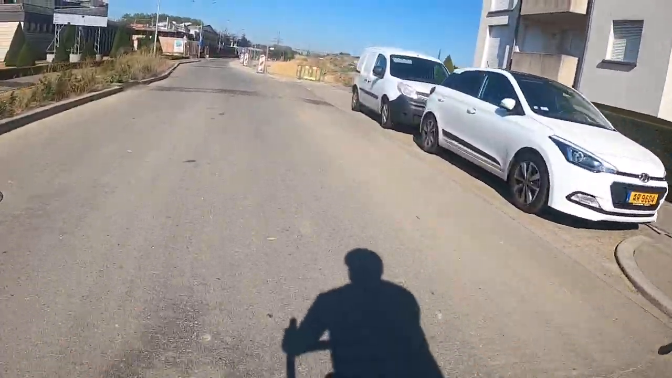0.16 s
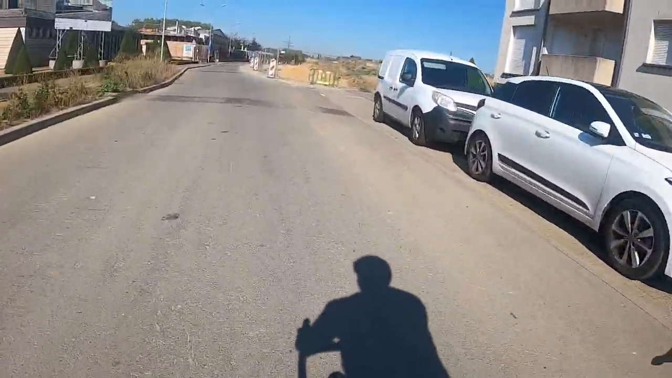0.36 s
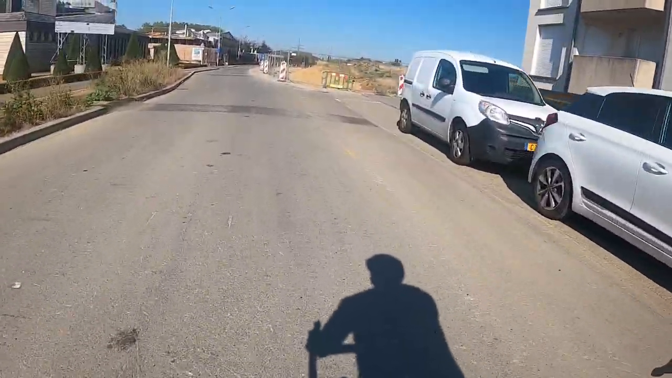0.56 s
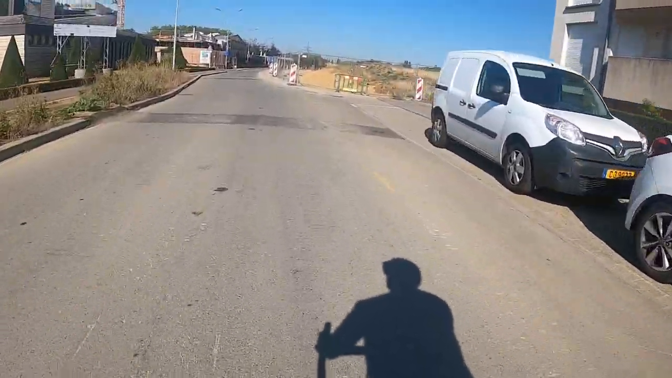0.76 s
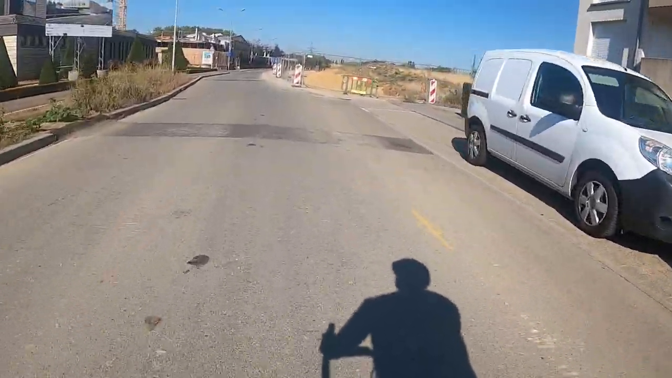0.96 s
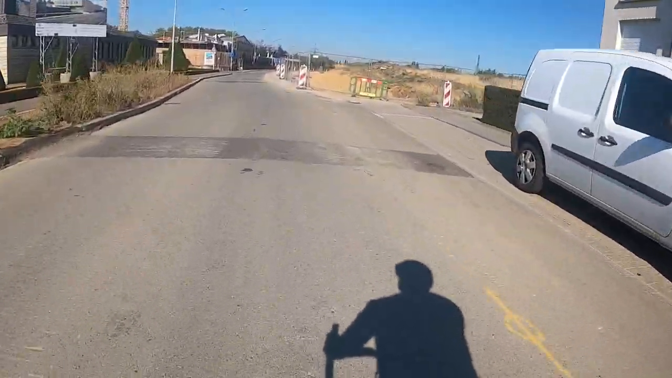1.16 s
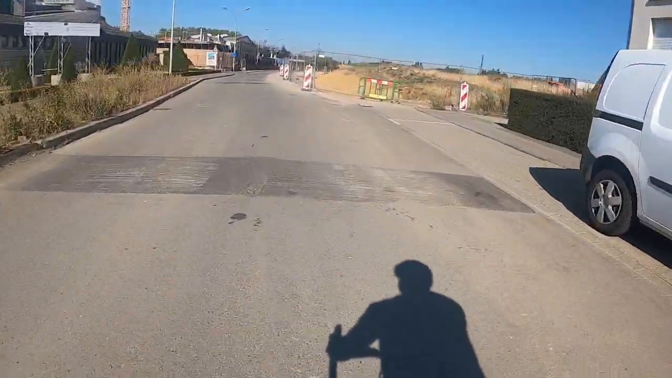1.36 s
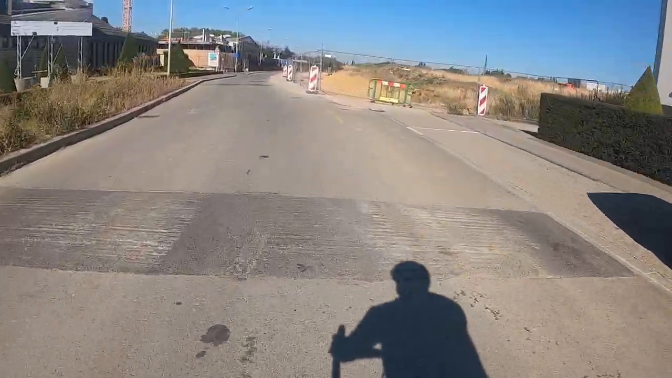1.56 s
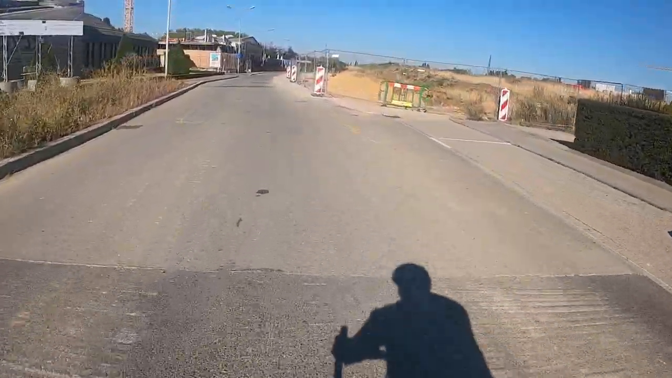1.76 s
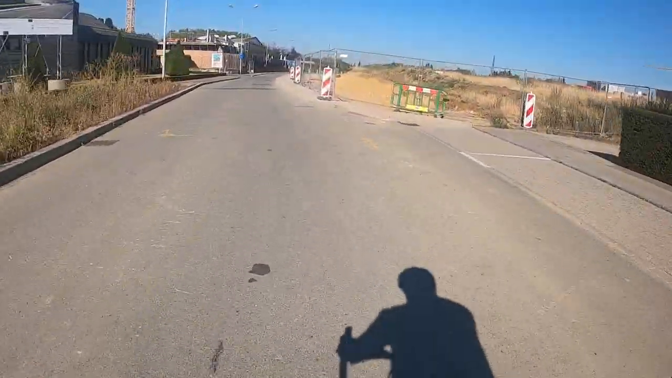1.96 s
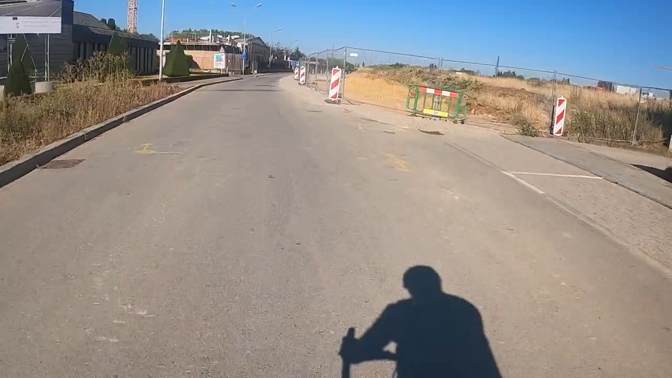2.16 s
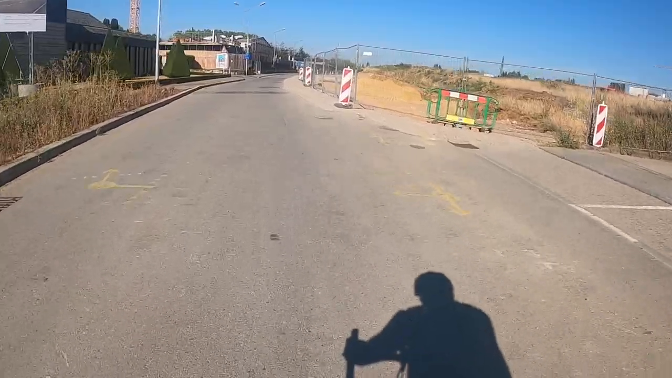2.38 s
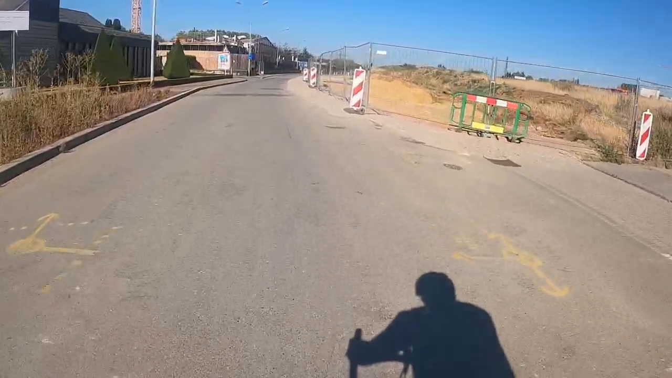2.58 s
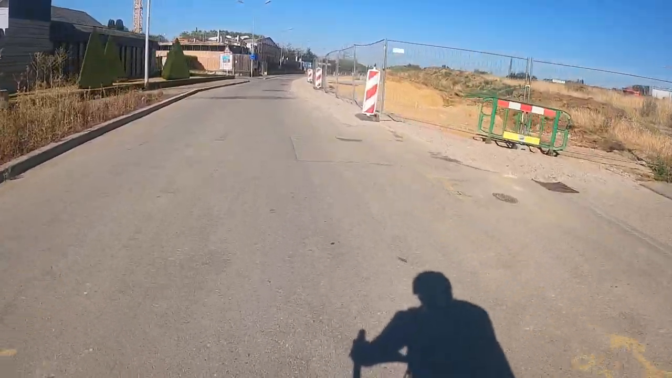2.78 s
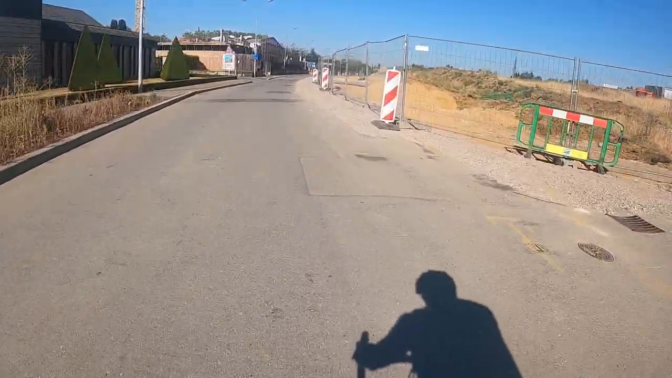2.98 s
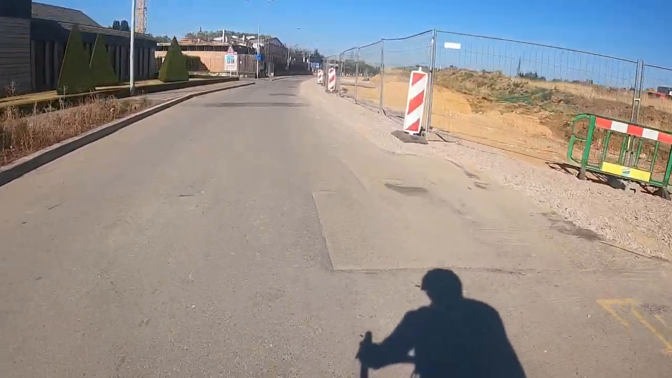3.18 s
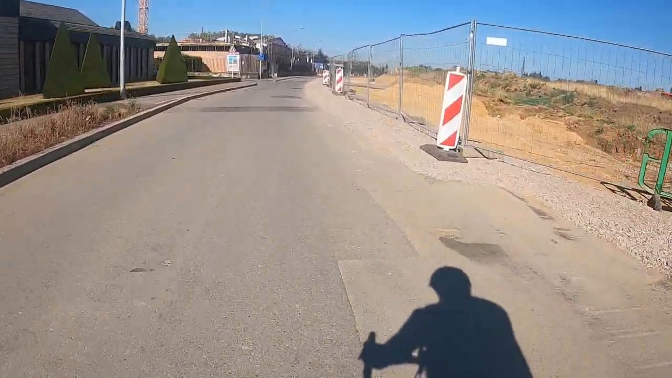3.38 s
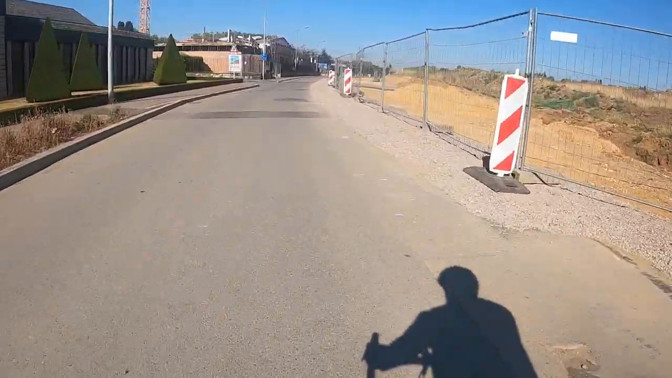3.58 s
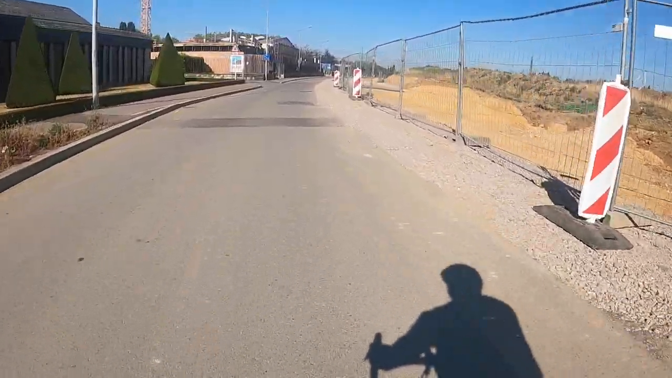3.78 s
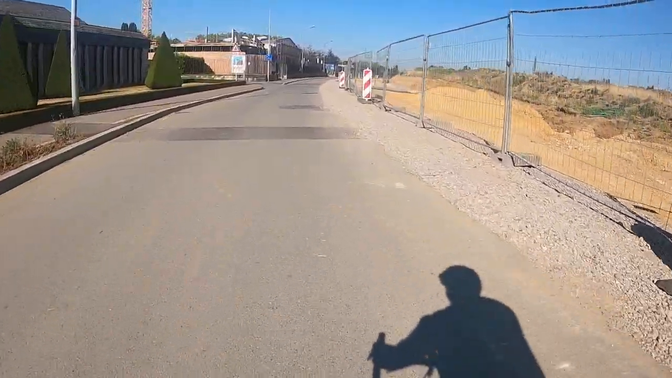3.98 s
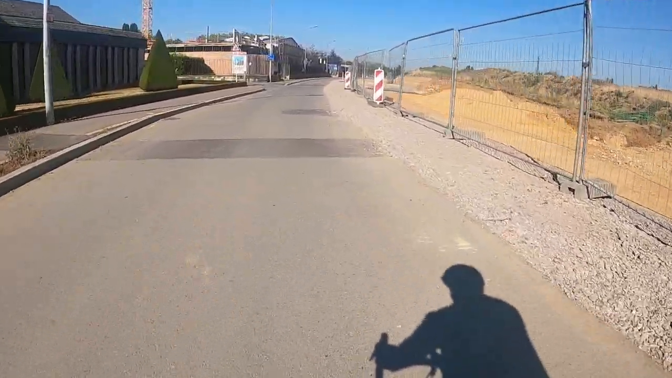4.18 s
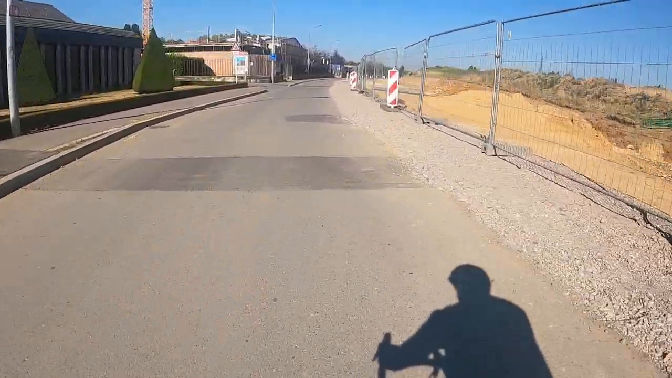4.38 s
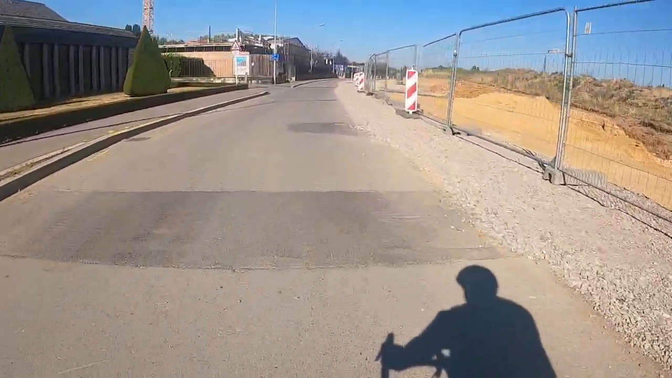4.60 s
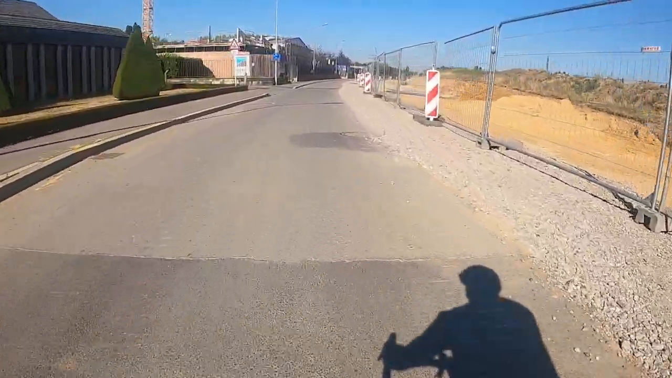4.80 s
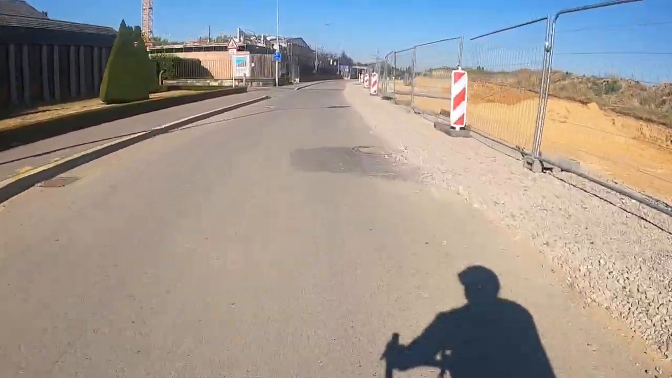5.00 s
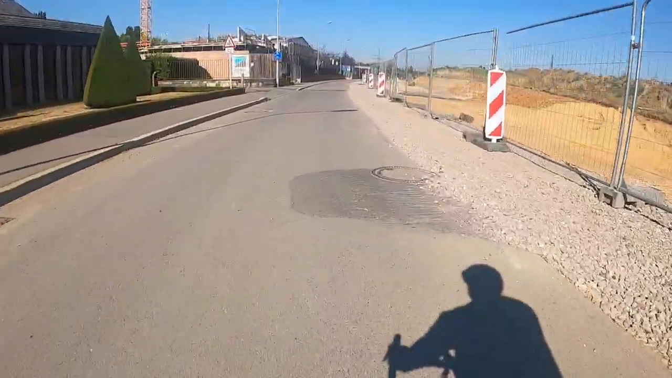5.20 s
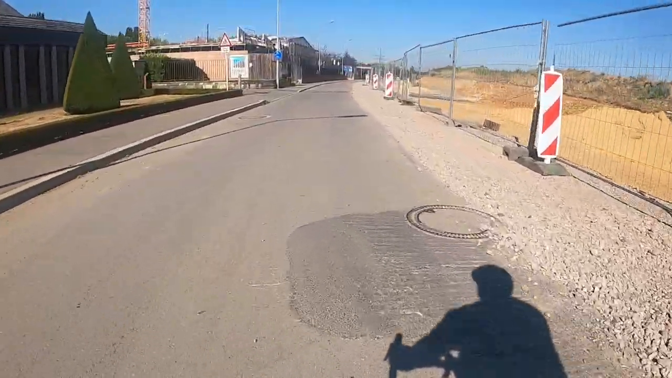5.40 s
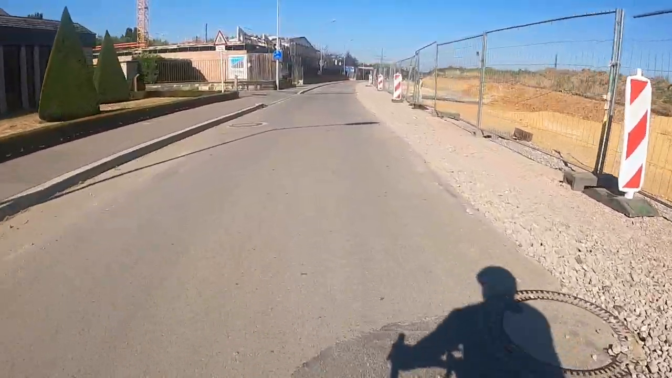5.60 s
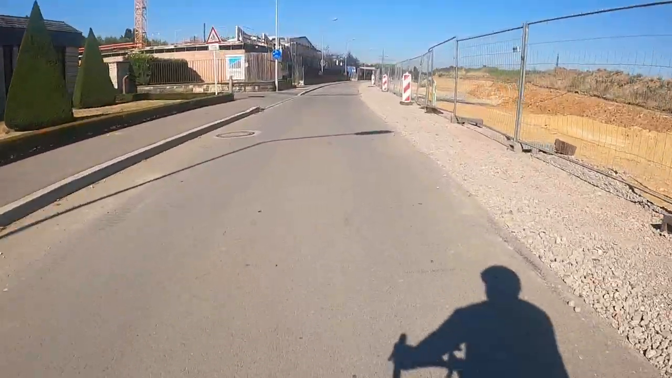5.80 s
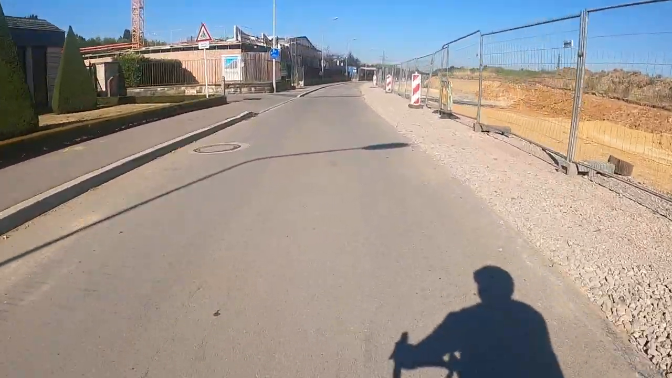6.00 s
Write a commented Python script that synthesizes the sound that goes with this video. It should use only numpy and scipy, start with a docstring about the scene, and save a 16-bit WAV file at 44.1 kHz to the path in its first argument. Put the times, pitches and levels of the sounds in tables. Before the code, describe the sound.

Close on a moving bike: deep wobbling rumble, wind thumps and grainy tyre noise, broken by short clattering bumps at the start, middle and end.

```python
"""Asphalt street, on a rolling bicycle; one microphone fixed to it, so close on every part of it.
From the start the frame bounces on its tyres (a wandering sine), wind buffets the microphone (coloured noise)
and road grain rings through tyre and frame (resonances); a hum and a roar off parked cars fade by about 1.8 s.
Wheels cross patch edges and loose parts rattle (ringing modes) from 0.2 s and again around 2 s.
A faint trembling tone joins at 3.2 s, the road grows louder near 4 s, and the densest rattle comes at 5 s."""
import sys
import numpy as np
from scipy import signal
from scipy.fft import rfft, irfft
from scipy.io import wavfile
from scipy.ndimage import uniform_filter1d

SR = 44100
rng = np.random.default_rng(int(sys.argv[2]) if len(sys.argv) > 2 else 0)


def master(y):
    """Save y as 16-bit WAV."""
    cut = np.clip(np.atleast_2d(y).T, -1, 1)
    pcm = np.round(cut * 32767)  # scale
    wavfile.write(sys.argv[1], SR, pcm.astype(np.int16))


def magnitude_from_level(level_db):
    """Linear magnitude for a level in decibels (20 dB per decade)."""
    exponent = np.asarray(level_db, float) / 20
    return 10 ** exponent


N = 266805

# frame bouncing on the tyres: (time [s], level [dB])
BOUNCE_LEVEL = [(0.0, -28), (0.22, -26), (0.29, -15), (0.4, -23.5), (0.54, -19.5), (0.59, -31.5),
                (1.13, -17.5), (1.2, -22.5), (2.0, -25), (2.04, -15.5), (2.93, -30.5), (2.98, -26),
                (3.1, -21), (3.25, -27.5), (3.33, -20), (3.72, -24), (3.76, -35), (3.94, -19),
                (3.99, -32.5), (4.45, -21.5), (4.52, -32), (4.73, -23), (4.92, -38.5), (5.04, -20.5),
                (5.37, -15.5), (5.71, -28), (5.8, -19.5), (5.9, -23), (5.95, -16), (6.05, -23)]
# hum beside the parked cars: (time [s], fundamental level [dB], octave level [dB])
HUM_LEVEL = [(0.0, -18.5, -31.5), (0.1, -24, -31.5), (0.2, -30, -36), (0.3, -28, -35.5), (0.42, -18, -50),
             (0.47, -41, -47), (0.56, -27, -41), (0.68, -21, -34), (0.8, -24, -36), (0.9, -26, -38),
             (0.97, -28, -41), (1.05, -33, -43), (1.2, -25, -43), (1.55, -25.5, -43), (1.76, -39, -34.5)]
# upper harmonics of the hum: (multiple of the fundamental, level over the fundamental [dB])
HUM_HARMONICS = [(3, -21.5), (4, -30.5)]
# wind on the microphone: (time [s], buffet level [dB], lift of the faster flutter [dB], air hiss level [dB])
WIND_LEVEL = [(0.0, -25, -3, -61.5), (0.23, -19.5, -1, -66), (0.29, -25, 10, -62), (0.35, -32.5, 4, -66.5),
              (0.46, -20.5, 1, -70), (0.62, -27, 3.5, -71.5), (0.76, -29, 0.5, -69), (0.93, -21, 0, -69),
              (1.14, -32, -5.5, -67.5), (1.5, -35, 13, -67), (1.53, -32.5, -3, -65.5), (1.72, -20, -1, -65),
              (1.85, -25, -3.5, -64), (1.97, -19.5, 3.5, -67.5), (2.12, -32.5, 3, -65.5),
              (2.18, -25.5, 4, -69), (2.44, -25.5, -8, -69.5), (2.59, -28, -2, -71), (2.73, -20, -1, -67.5),
              (2.78, -22, -3.5, -70.5), (2.85, -18, -3, -71.5), (2.92, -19.5, -2.5, -70),
              (3.0, -22.5, -1.5, -68.5), (3.17, -27.5, -7, -69.5), (3.31, -24, 4, -70.5),
              (3.37, -28, -3, -67.5), (3.59, -26.5, -5, -66.5), (3.62, -21, -11.5, -66.5),
              (3.89, -39, 14, -68), (4.06, -22, -3, -68), (4.15, -25.5, -3, -70.5),
              (4.25, -21, -10.5, -67.5), (4.5, -29, 0.5, -66), (4.94, -38, 20, -66), (5.04, -27, 4, -68),
              (5.15, -40, 8, -66), (5.17, -26.5, 6, -68), (5.36, -29.5, -2, -71.5), (5.61, -29, -4.5, -74),
              (5.78, -23, -2, -72), (5.85, -33.5, 5, -70), (6.05, -29, -3, -74)]
# relative spectrum of the buffeting: (frequency [Hz], density [dB per Hz])
BUFFET_SPECTRUM = [(16, 0), (24, -0.5), (32, 3.5), (45, 1.5), (70, 4.5), (110, -3), (160, -8), (230, -17),
                   (400, -37.5)]
# relative spectrum of the air hiss: (frequency [Hz], density [dB per Hz])
HISS_SPECTRUM = [(1000, -22), (1700, 3), (2420, -6), (3010, -7), (3790, -13), (4250, -13.5), (4620, -16.5),
                 (5110, -19), (10600, -35.5), (13700, -63), (22000, -120)]
# road under the wheels, between the bumps:
# (time [s], tyre thrum [dB], frame roar [dB], spoke whirr [dB], grit sizzle [dB])
ROAD_LEVEL = [(0.0, -37, -41.5, -36, -51.5), (0.35, -35, -43.5, -42, -56), (0.7, -40, -46, -40.5, -57),
              (1.1, -39.5, -41, -42.5, -51.5), (1.55, -39.5, -41, -41, -52.5), (1.9, -37, -42, -41, -53.5),
              (2.4, -40, -43.5, -43.5, -52), (2.9, -40, -43, -42, -51), (3.3, -38.5, -43, -41.5, -52),
              (3.9, -37, -36, -37.5, -46.5), (4.4, -35, -37, -38, -48.5), (5.0, -33, -37, -36, -45.5),
              (5.15, -42.5, -40.5, -43, -56), (5.4, -39, -44.5, -41.5, -52.5),
              (6.05, -40, -43.5, -42.5, -51.5)]
# resonances of the tyre: (frequency [Hz], width [Hz], relative level [dB])
TYRE_RESONANCES = [(250, 75.6, -5.5), (295, 38, -1.5), (340.4, 32.3, -1.5), (399.6, 57, -4.5),
                   (447, 50.4, -6.5)]
# resonances of the frame: (frequency [Hz], width [Hz], relative level [dB])
FRAME_RESONANCES = [(537, 200, -11.5), (667, 86, -3.5), (767, 71, -2), (895, 67, -5.5)]
# resonances of the spokes: (frequency [Hz], width [Hz], relative level [dB])
SPOKE_RESONANCES = [(985, 99, -4), (1159, 71, 0.5), (1318, 47, 1), (1470, 67, -1.5), (1646, 65, -8.5)]
# resonances of small parts on the frame: (frequency [Hz], width [Hz], relative level [dB])
SMALL_PART_RESONANCES = [(1927, 170, 1), (2260, 420, -4.5), (2597, 130, 1), (3026, 240, -3.5),
                         (3384, 180, -1.5), (3930, 270, -7.5), (4214, 130, -2), (4560, 290, -13)]
# coarse spots that shake the wheels harder: (time of peak [s], half of the rise time [s], lift [dB])
COARSE_SPOTS = [(0.15, 0.042, 1.5), (0.27, 0.038, 5.5), (0.44, 0.034, 2.5), (0.6, 0.016, 4),
                (1.46, 0.044, 5), (1.992, 0.041, 9.5), (2.09, 0.045, 5), (2.2, 0.054, 7), (2.34, 0.016, 4),
                (2.71, 0.018, 4), (3.24, 0.13, 4.5), (3.52, 0.025, 4.5), (3.89, 0.031, 0.5),
                (4.63, 0.0099, 1.5), (5.045, 0.017, 12), (5.12, 0.033, 6), (5.19, 0.028, 10.5),
                (5.27, 0.027, 3.5), (5.61, 0.014, 0), (5.69, 0.016, 2.5), (5.77, 0.037, 7)]
# share of that lift taken by each: (thrum [dB per dB], roar [dB per dB], whirr [dB per dB], sizzle [dB per dB])
LIFT_SHARES = (0.88, 0.45, 0.67, 0.6)
# tyre roar thrown back by the parked cars: (time [s], level [dB])
THROWN_BACK_LEVEL = [(0.0, -34), (0.2, -38.5), (0.35, -46), (0.55, -48), (0.85, -43), (1.2, -46),
                     (1.6, -69), (6.05, -89)]
# resonances of the car sides: (frequency [Hz], width [Hz], relative level [dB])
CAR_SIDE_RESONANCES = [(566, 190, -10.5), (1034, 103, -1)]
# knocks of loose parts: (time [s], blow level [dB], lift of the low modes [dB], lift of the high modes [dB])
KNOCKS = [(0.219, -33, -1, -4), (0.236, -30, -7, -17), (0.245, -28, 3, -15), (0.252, -39, 0, -11),
          (0.2583, -19.5, -12, -10.5), (0.268, -45, -5, -9), (0.274, -34, -6, -10), (0.286, -36, -6, -7),
          (0.311, -33, -6, -14), (0.319, -34, -5, -22), (0.338, -40, -6, -14), (0.3865, -47, -5, -6),
          (0.4287, -29.5, -8, -20), (0.441, -43, -9, -8), (1.052, -35, -12, -19), (1.966, -32, -12, -26),
          (1.972, -33, -8, -28), (1.98, -44, 13, -23), (2.064, -32, -7, -18), (2.075, -29, -19, -32),
          (2.087, -39, -8, -10), (2.113, -45, -6, -14), (2.221, -45, -8, -9), (2.347, -36, -16, -21),
          (2.36, -38, -13, -13), (2.389, -30.5, -22, -18), (3.805, -30.5, -10, -35), (5.0156, -29, -10, -9),
          (5.024, -31, 3, -15), (5.0307, -17, -6, -20), (5.036, -24, -1, -12), (5.04, -28, -6, -9),
          (5.0448, -17.5, -3, -12), (5.0495, -22, 9, -11), (5.054, -28, 10.5, -15), (5.0555, -29, -7, -14),
          (5.06, -30, -1, -14), (5.064, -27, 7, -18), (5.068, -35, 2, -17), (5.0745, -26, -17, -14),
          (5.0793, -21, -22, -22), (5.0845, -35, -14, -20), (5.0965, -32, -16, -24),
          (5.1025, -32, -11, -11), (5.128, -32, 2, -16), (5.1725, -34, -10, -13), (5.179, -27.5, 2, -13),
          (5.1897, -25, -13, -23), (5.201, -39.5, -14, 0), (5.212, -40, -6, -14), (5.224, -43, 12, -28),
          (5.2405, -27.5, -17, -12.5), (5.244, -33, -16, -25), (5.264, -33, -18, -14),
          (5.269, -35, -14, -13), (5.2907, -34.5, 2, -16), (5.3847, -28, -19, -29), (5.3974, -41, -21, -12),
          (5.743, -28, -8, -26), (5.752, -24.5, -8, -21), (5.765, -25.5, -3, -13), (5.778, -34, 3, -12),
          (5.789, -32.5, -15, -7), (5.8424, -31.5, -4, -33), (5.9173, -41, -11, -13),
          (5.9384, -38, -19, -27), (6.03, -40, -13, -5)]
# modes of the loose parts: (frequency [Hz], relative level [dB], decay by 60 dB [s])
PART_MODES = [(570, -9.5, 0.022), (930, -14.5, 0.025), (1270, -9.5, 0.03), (1745, -8.5, 0.014),
              (1937, -11.5, 0.017), (2290, -12, 0.017), (2664, -15.5, .02), (3140, -18, 0.0071),
              (3290, -10, 0.009), (3600, -10, 0.0094), (3940, -10, 0.0087), (4230, -11.5, 0.0079),
              (4970, -18, 0.007), (5140, 2.5, 0.0029), (6200, -5, 0.0063), (6960, -6.5, 0.005),
              (7600, -4, 0.005), (8900, -13.5, 0.0082), (9800, -9, 0.0018), (12600, -21.5, 0.003),
              (14300, -25, 0.002)]
# wheel striking an edge: (time [s], blow level [dB], lift of the modes above 250 Hz [dB])
EDGE_BLOWS = [(0.2464, -5, -3), (0.261, -6.5, 5), (0.271, -8.5, -14), (0.449, -4.5, -12), (0.46, -8, -3),
              (1.951, -14, -7), (1.97, -15, 11), (2.022, -10.5, -7), (2.047, -12, 7), (2.071, -21, -1),
              (2.108, -20, -5), (2.151, -9, -6), (2.175, -22, 6), (2.195, -20, 8), (2.215, -24, 5),
              (2.336, -22, 1), (3.201, -21, 5), (3.88, -20, 10), (4.635, -16, 7), (5.031, -7.5, -8),
              (5.04, -9, -4), (5.057, -1, -10), (5.074, -9.5, 4), (5.085, -10.5, 9.5), (5.128, -11, 2),
              (5.169, -14, 8), (5.208, -8.5, 3.5), (5.26, -7.5, -3), (5.285, -20, 8), (5.607, -21, 14.5),
              (5.689, -23.5, 14), (5.744, -12, 5.5), (5.764, -8, -1), (5.788, -18, -3)]
# modes of the rim: (frequency [Hz], relative level [dB], decay by 60 dB [s])
RIM_MODES = [(134.7, -16, 0.09), (206, -14, 0.055), (266.5, -23, 0.087), (295.7, -21.5, 0.14),
             (351, -25, 0.07), (453, -24.5, 0.014), (593, -27.5, 0.026)]

BOUNCE_HZ, BOUNCE_WANDER, BOUNCE_TREMBLE = 39.66, 0.0257, 0.0712  # pitch; slow and fast share of pitch change
BOUNCE_SWELL_DB = 1  # slower chance swells of the bounce
HUM_HZ, HUM_RISE_HZ, HUM_RISE_FROM_S, HUM_RISE_S = 84.75, 1.413, 0.403, 0.3
GUST_DB, HISS_GUST_DB = 2, 0.93  # spread of the chance gusts
FLUTTER_AGAINST = 0.33  # how far the faster flutter holds its level through a chance gust
HISS_FOLLOWS = 0.33  # growth of the hiss, dB per dB of coarseness
GRIT_PER_S, GRIT_DB = 350, -7  # single stones among the road grain
CHATTER_PER_S, CHATTER_DB = 7.8, -56  # chance knocks where no coarse spot lifts them
CHATTER_FOLLOWS = 0.6  # growth of their level and number, dB per dB of coarseness
CRACK_DB, CRACK_AFTER_S = -4, 0.002  # clean blow of a knock, just after its start
SCUFF_S, JANGLE_S, JANGLE_LEAD_S, JANGLE_DB = 0.0011, 0.007, 0.0067, -9
TONE_FROM_S, TONE_TO_S, TONE_HZ, TONE_DB = 3.2, 6.2, 290.2, -45


def rms_one(x):
    """Scale to unit rms."""
    return x / np.sqrt(np.mean(x ** 2) + 1e-20)


def in_time(rows):
    """Columns of a table, joined by straight lines at every sample."""
    s, *columns = np.transpose(rows)
    return [np.interp(np.arange(N) / SR, s, column) for column in columns]


def drift(rate_hz):
    """Slow chance of spread 1: noise at every 40th sample through two equal one-pole low-passes."""
    r = np.exp(-80 * np.pi * rate_hz / SR)
    noise = rng.standard_normal(N // 40 + 2002)
    slow = signal.lfilter([1], [1, -2 * r, r * r], noise)[2000:]  # the run-in is cut off
    return np.interp(np.arange(N) / 40, np.arange(len(slow)), rms_one(slow - slow.mean()))


def coloured(spectrum, patchy_db, lump_rate, tilt_db=0, band=(0, 1e5)):
    """Lumpy noise of a given spectrum, rms 1 within band before tilt_db lifts what lies above about 100 Hz."""
    hz, db = np.transpose(spectrum)
    grid = np.fft.rfftfreq(N, 1 / SR) + 1e-3
    shape = magnitude_from_level(np.interp(np.log(grid), np.log(hz), db, left=-90, right=-90))
    in_band = (grid > band[0]) & (grid < band[1])
    shape = shape * np.sqrt(len(grid) / np.sum(shape[in_band] ** 2))
    white = rfft(rng.standard_normal(N))
    upper = 1 / (1 + (105 / grid) ** 6)
    low_noise = irfft(white * shape * (1 - upper), N)
    high_noise = irfft(white * shape * upper, N)
    return (low_noise + magnitude_from_level(tilt_db) * high_noise) * rms_one(magnitude_from_level(patchy_db * drift(lump_rate)))


def evened(x, span_s, share):
    """Take a share of the chance swells out of a noise, so that its level table carries the lumps."""
    level = np.sqrt(uniform_filter1d(x ** 2, int(span_s * SR)) + 1e-6)
    return x / level ** np.clip(share, 0, 1)


def coarseness():
    """Lift in dB over the coarse spots, each a triangle in time."""
    s = np.arange(N) / SR
    return sum(db * np.clip(1 - abs(s - at) / (2 * half_rise_s), 0, 1) for at, half_rise_s, db in COARSE_SPOTS)


def shower(per_s, spread_db):
    """Clicks at chance moments, of uneven size."""
    return (rng.random(N) < per_s / SR) * magnitude_from_level(spread_db * np.minimum(rng.exponential(1, N), 4))


def shaken(resonances, grain_db, patchy_db):
    """Road grain, a dense uneven shower of tiny blows, into steep parallel resonances; rms 1."""
    grain = rng.standard_normal(N) * magnitude_from_level(grain_db * drift(79.0))
    stones = shower(GRIT_PER_S, spread_db=3.0) * rng.choice([-1, 1], N)
    grain = rms_one(grain) + magnitude_from_level(GRIT_DB) * rms_one(stones)
    out = np.zeros(N)
    for k, (hz, width, db) in enumerate(resonances):
        r = np.exp(-np.pi * width / SR)
        b = (1 - r * r) / 2 * np.array([1, 0, -1])
        a = [1, -2 * r * np.cos(2 * np.pi * hz / SR), r * r]
        level = magnitude_from_level(db + patchy_db * drift(2.5))
        out += (-1) ** k * level * signal.lfilter(b, a, grain)  # neighbours in opposite sign
    return rms_one(out)


def strikes(times, sizes):
    """One click a blow."""
    clicks = np.zeros(N)
    np.add.at(clicks, np.round(times * SR).astype(int), sizes)
    return clicks


def swell(blows, length_s):
    """Each click becomes a hump that rises and dies, of unit energy."""
    r = np.exp(-1 / (length_s * SR))
    return signal.lfilter([2 * (1 - r) ** 1.5], [1, -2 * r, r * r], blows + 1e-18)


def ring(clicks, hz, t60):
    """A unit click sets a sine of height 1 ringing, down 60 dB after t60 seconds."""
    r = np.exp(-np.log(1000) / (t60 * SR))
    w = 2 * np.pi * hz / SR
    return signal.lfilter([0, np.sin(w)], [1, -2 * r * np.cos(w), r * r], clicks + 1e-18)


def bounce():
    """A near sine whose pitch wanders and trembles as the load on the tyres shifts."""
    db, = in_time(BOUNCE_LEVEL)
    hz = BOUNCE_HZ * (1 + BOUNCE_WANDER * drift(1.11) + BOUNCE_TREMBLE * drift(9.6))
    swells = rms_one(magnitude_from_level(BOUNCE_SWELL_DB * drift(7.2) + 2.4 * drift(23.0)))
    return np.sqrt(2) * magnitude_from_level(db) * swells * np.sin(2 * np.pi * np.cumsum(hz) / SR)


def hum():
    """A low stack of harmonics, gliding up a little in pitch, that fades as the cars fall behind."""
    db, octave_db = in_time(HUM_LEVEL)
    s = np.arange(N) / SR
    fade = np.clip((HUM_LEVEL[-1][0] - s) / 0.14, 0, 1)
    hz = HUM_HZ + HUM_RISE_HZ * np.clip((s - HUM_RISE_FROM_S) / HUM_RISE_S, 0, 1)
    turn = 2 * np.pi * np.cumsum(hz) / SR
    upper = sum(magnitude_from_level(level_db + 0.4 * drift(11.0)) * np.sin(int(k) * turn) for k, level_db in HUM_HARMONICS)
    stack = magnitude_from_level(db + 0.51 * drift(3.7)) * (np.sin(turn) + upper)
    octave = magnitude_from_level(octave_db + 2.0 * drift(8.5)) * np.sin(2 * turn)
    return np.sqrt(2) * fade * (stack + octave)


def wind():
    """Lumpy low buffeting at the microphone and a smoother hiss; over coarse spots a bright treble wash swells
    in the same band."""
    buffet_db, flutter_db, hiss_db = in_time(WIND_LEVEL)
    gust_db = GUST_DB * drift(6.5)
    tilt_db = flutter_db - FLUTTER_AGAINST * gust_db
    buffet = coloured(BUFFET_SPECTRUM, patchy_db=-0.5, lump_rate=14.0, tilt_db=tilt_db, band=(50, 200))
    buffet = evened(buffet, span_s=0.045, share=0.8)
    hiss = coloured(HISS_SPECTRUM, patchy_db=0.6, lump_rate=27.0, band=(5000, 10000))
    hiss_db = hiss_db + HISS_GUST_DB * drift(4.9) + HISS_FOLLOWS * coarseness()
    return magnitude_from_level(buffet_db + gust_db) * buffet + magnitude_from_level(hiss_db) * hiss


def road():
    """Tyre, frame, spokes and small parts each ring to road grain, louder over coarse spots."""
    lift_db = coarseness()
    levels_db = [db + share * lift_db for db, share in zip(in_time(ROAD_LEVEL), LIFT_SHARES)]
    thrum_db, roar_db, whirr_db, sizzle_db = levels_db
    thrum = magnitude_from_level(thrum_db) * shaken(TYRE_RESONANCES, grain_db=-1.0, patchy_db=0.88)
    roar = magnitude_from_level(roar_db) * shaken(FRAME_RESONANCES, grain_db=0.5, patchy_db=0.2)
    whirr = magnitude_from_level(whirr_db) * shaken(SPOKE_RESONANCES, grain_db=0.6, patchy_db=0.43)
    sizzle = magnitude_from_level(sizzle_db) * shaken(SMALL_PART_RESONANCES, grain_db=1.0, patchy_db=1.0)
    dull = signal.butter(4, 5200, fs=SR, output="sos")  # rubber and padding swallow the top
    return signal.sosfilt(dull, thrum + roar + whirr + sizzle)


def thrown_back():
    """Roar off the car sides: road grain of its own in two resonances, sinking as they fall behind."""
    db, = in_time(THROWN_BACK_LEVEL)
    return magnitude_from_level(db) * shaken(CAR_SIDE_RESONANCES, grain_db=3.5, patchy_db=-0.5)


def rattle():
    """Loose parts knock: a clean crack, a short noisy scuff and a fainter, longer jangle drive every mode."""
    s, blow_db, low_db, high_db = np.transpose(KNOCKS)
    chance = rng.standard_normal((len(s), len(PART_MODES), 2))
    # each knock rebounds once, after a chance gap
    again = np.minimum(s + rng.uniform(0.0086, 0.013, len(s)), (N - 1) / SR)
    lift_db = CHATTER_FOLLOWS * coarseness()
    chatter = magnitude_from_level(CHATTER_DB + lift_db) * shower(CHATTER_PER_S * magnitude_from_level(lift_db), spread_db=5.0)
    out = np.zeros(N)
    for k, (hz, db, t60) in enumerate(PART_MODES):
        share_db = low_db if k < 6 else high_db if k > 12 else 0
        level_db = blow_db + share_db + db
        first = strikes(s, magnitude_from_level(level_db + 1.65 * chance[:, k, 0]))
        rebound = strikes(again, magnitude_from_level(level_db - 24 + 3.5 * chance[:, k, 1]))
        blows = first + rebound + chatter * magnitude_from_level(db - 15.5 * (k > 12))  # chatter is weak in the high modes
        # the scuff peaks with the crack; the jangle builds before it and dies after
        scuff = np.roll(swell(blows, SCUFF_S), int((CRACK_AFTER_S - SCUFF_S) * SR))
        jangle = magnitude_from_level(JANGLE_DB) * np.roll(swell(blows, JANGLE_S), -int(JANGLE_LEAD_S * SR))
        crack = magnitude_from_level(CRACK_DB) * np.roll(blows, int(CRACK_AFTER_S * SR))
        rings = ring((scuff + jangle) * rng.standard_normal(N) + crack, hz, t60)
        # each mode keeps to its own band, with no broad click around it
        around_mode = signal.butter(2, [hz / 1.07, hz * 1.28], "band", fs=SR, output="sos")
        out += signal.sosfilt(around_mode, rings)
    return out


def thuds():
    """At a patch edge a soft blow through the tyre, of either sign, sets the wheel ringing low."""
    s, blow_db, upper_db = np.transpose(EDGE_BLOWS)
    chance = rng.standard_normal((len(s), len(RIM_MODES)))
    way = rng.choice([-1, 1], len(s))
    out = np.zeros(N)
    for k, (hz, db, t60) in enumerate(RIM_MODES):
        level_db = blow_db + db + (hz > 250) * upper_db + 0.9 * chance[:, k]
        out += ring(strikes(s, way * magnitude_from_level(level_db)), hz, t60)
    return signal.sosfilt(signal.butter(2, 850, fs=SR, output="sos"), out)


def trembling_tone():
    """A faint sine, unsteady in pitch and level, through the later part of the ride."""
    s = np.arange(N) / SR
    fades = np.clip(np.minimum(s - TONE_FROM_S, TONE_TO_S - s) / 0.027, 0, 1)
    hz = TONE_HZ * (1 + 0.01057 * drift(3.1) + 0.017 * drift(20.0))
    level = magnitude_from_level(TONE_DB + 1.5 * drift(4.0) + 2.0 * drift(21.0))
    return fades * np.sqrt(2) * level * np.sin(2 * np.pi * np.cumsum(hz) / SR)


def scene():
    """Everything reaches one microphone through air and mount."""
    rolling = bounce() + hum() + wind() + road() + thrown_back()
    return (rolling + rattle() + thuds() + trembling_tone())[None]


def low_pass(x):
    """Removes everything above the highest recorded frequency."""
    return signal.sosfilt(signal.butter(12, 15400, fs=SR, output="sos"), x)


def record(dry):
    """The very top is weak, a little weaker still above 11 kHz."""
    weak_top = signal.butter(3, 10500, fs=SR, output="sos")
    heard = signal.sosfilt(weak_top, dry)
    below_step = signal.sosfiltfilt(signal.butter(8, 10900, fs=SR, output="sos"), heard)
    above_step = heard - below_step
    return low_pass(below_step + magnitude_from_level(-1.5) * above_step)


dry = scene()
out = record(dry)
master(out)
```